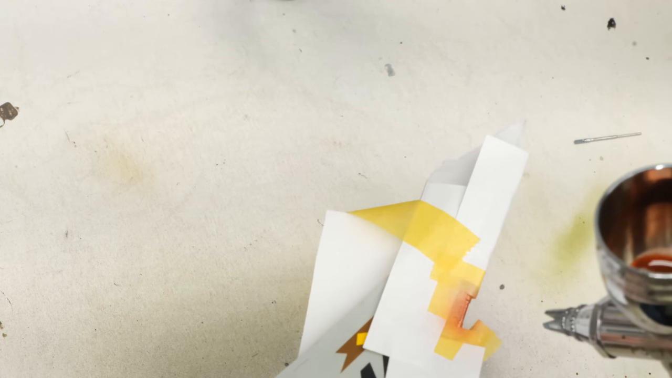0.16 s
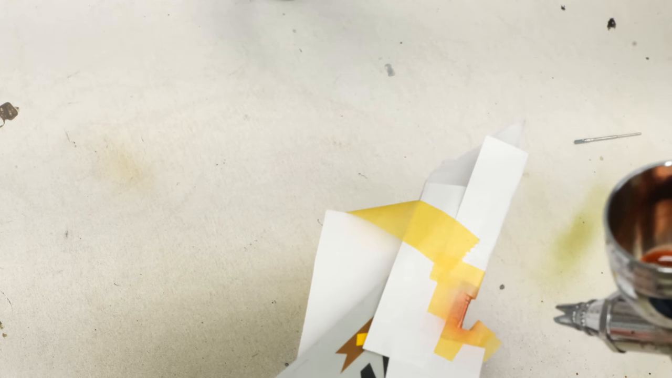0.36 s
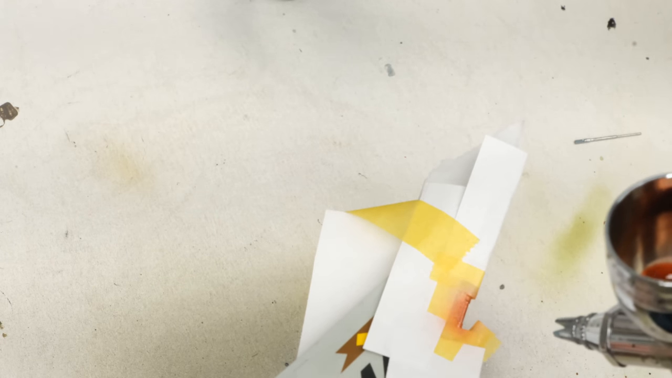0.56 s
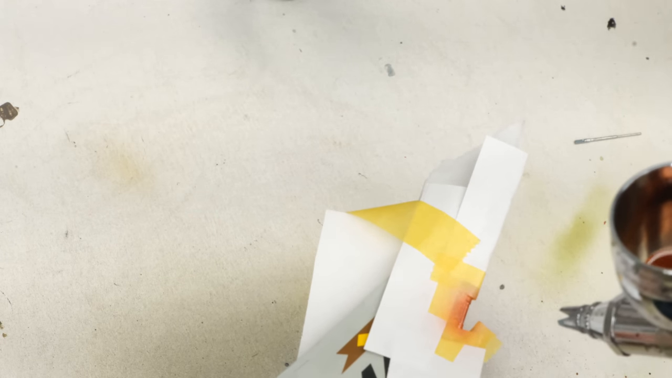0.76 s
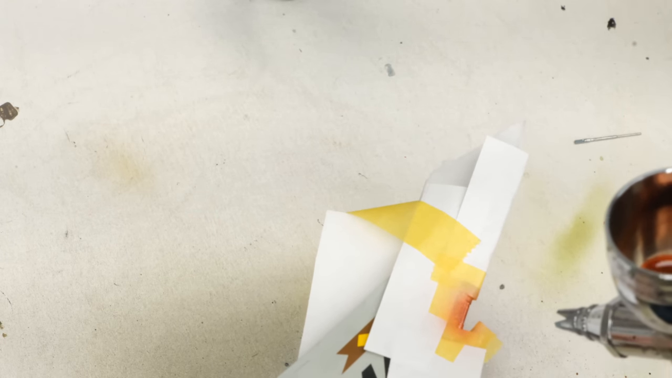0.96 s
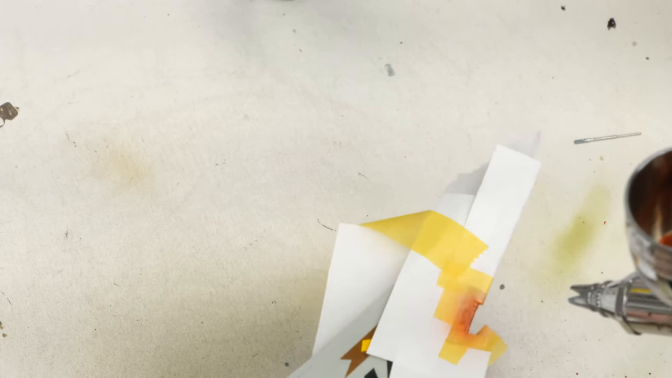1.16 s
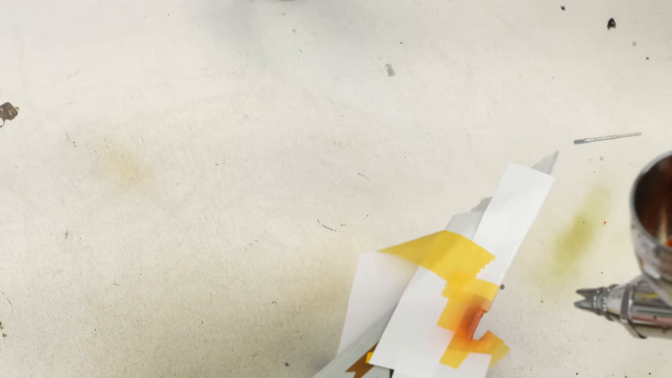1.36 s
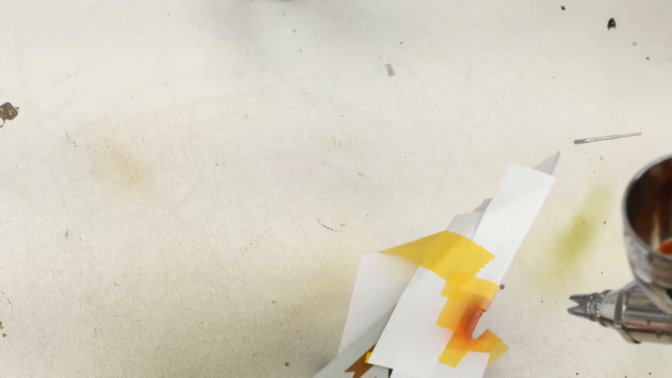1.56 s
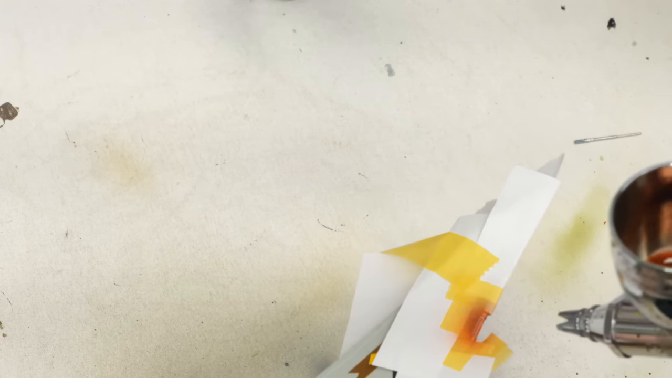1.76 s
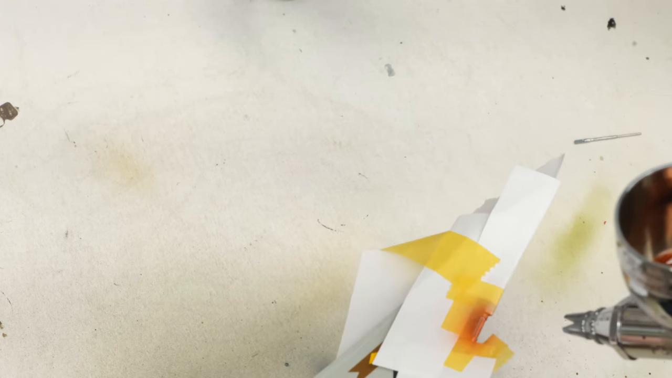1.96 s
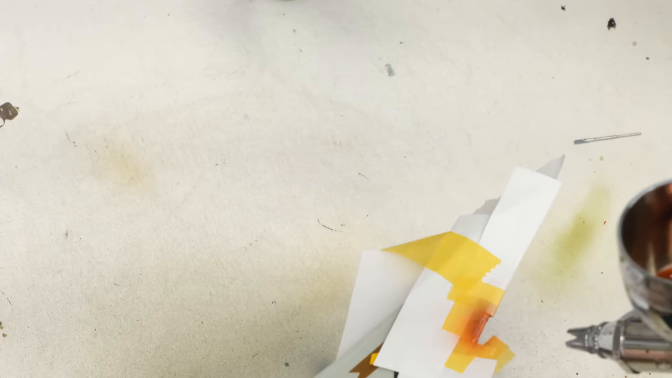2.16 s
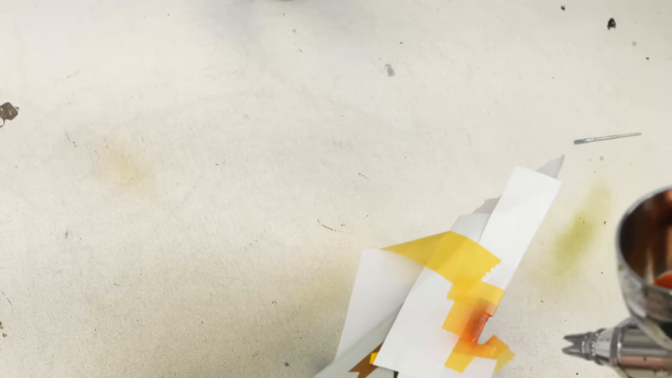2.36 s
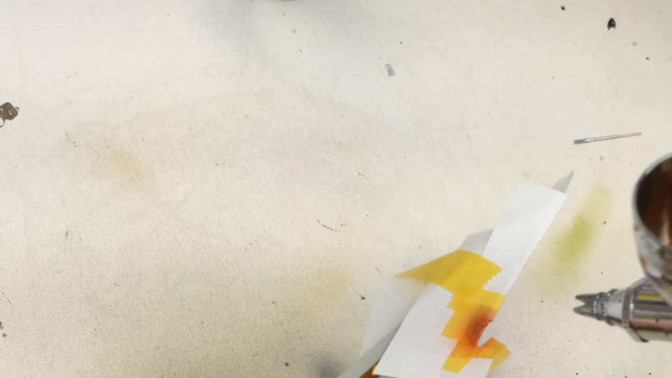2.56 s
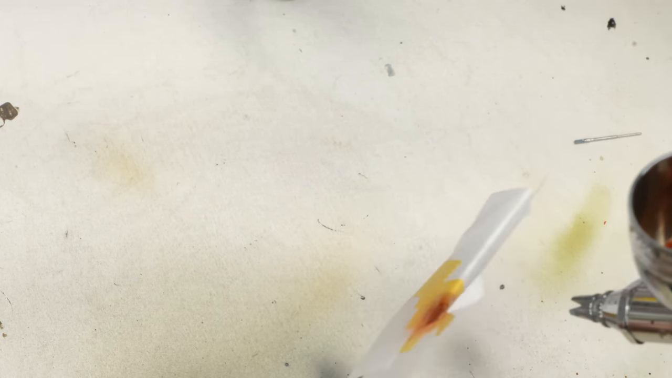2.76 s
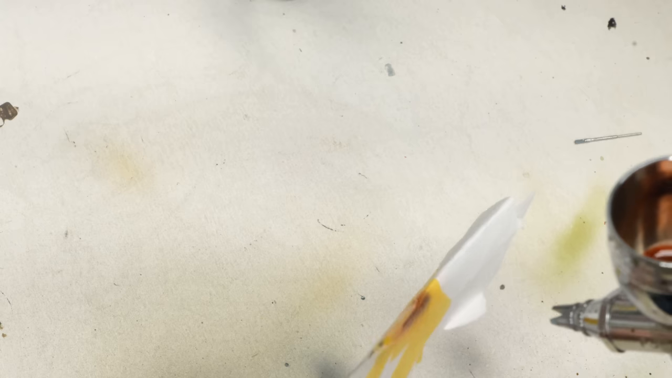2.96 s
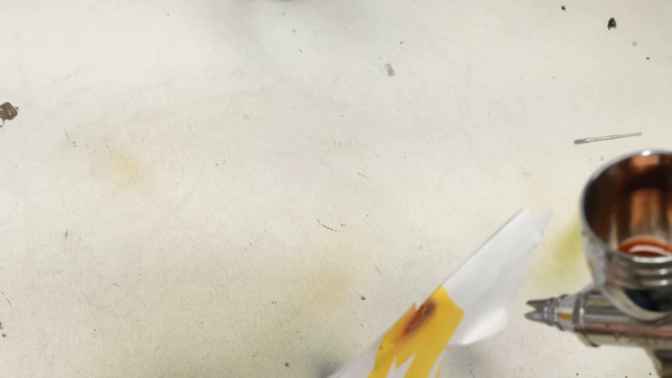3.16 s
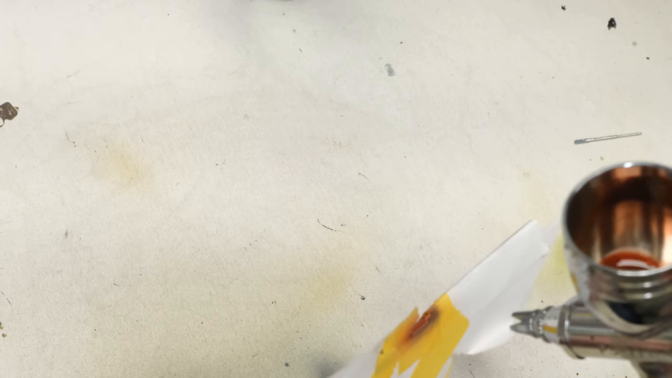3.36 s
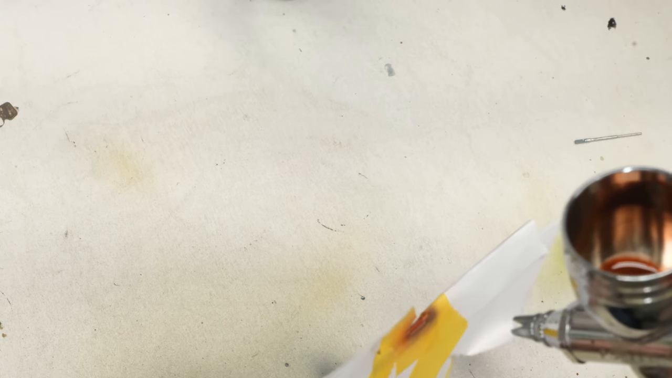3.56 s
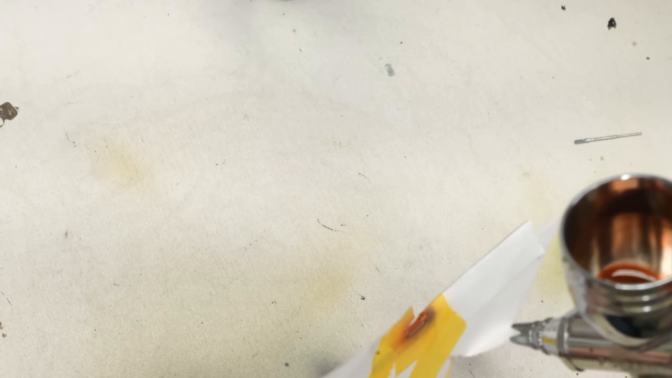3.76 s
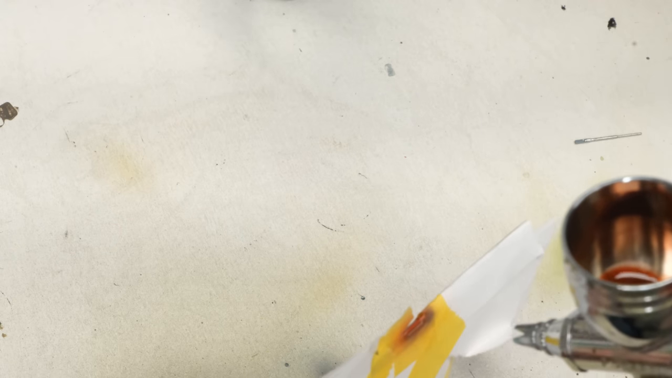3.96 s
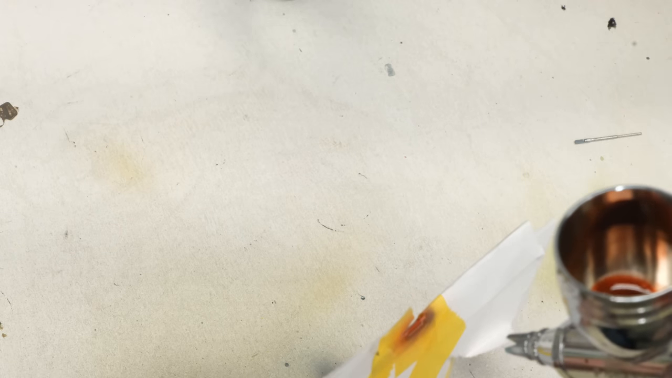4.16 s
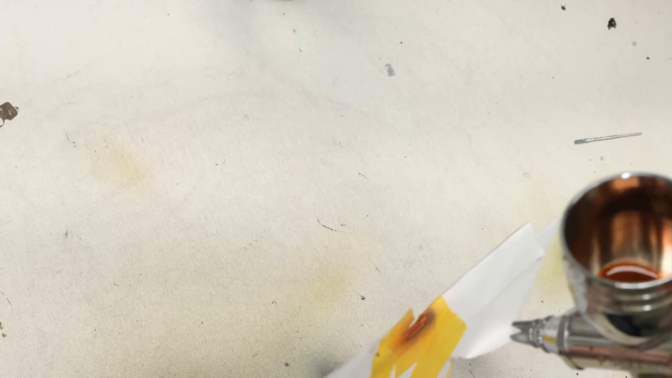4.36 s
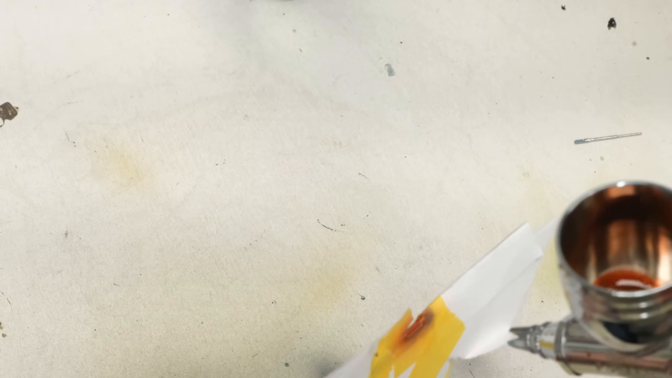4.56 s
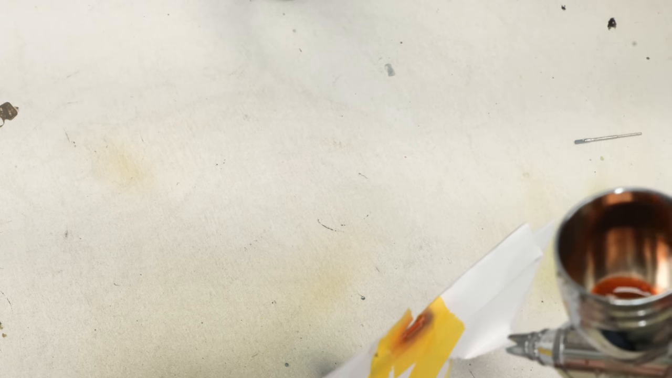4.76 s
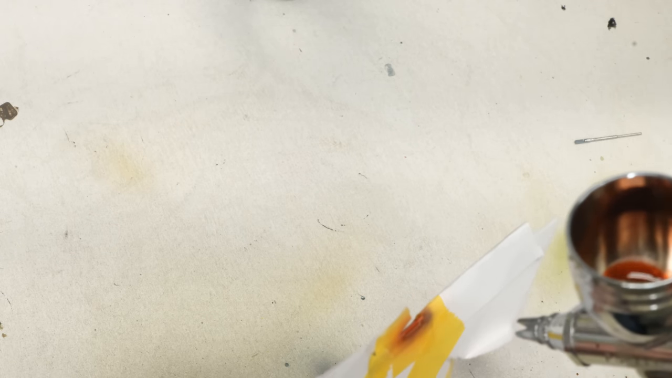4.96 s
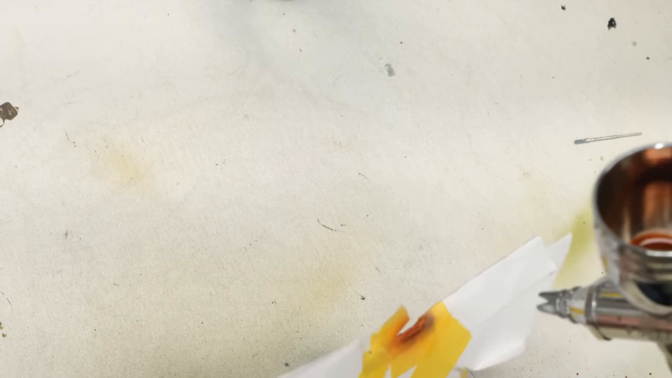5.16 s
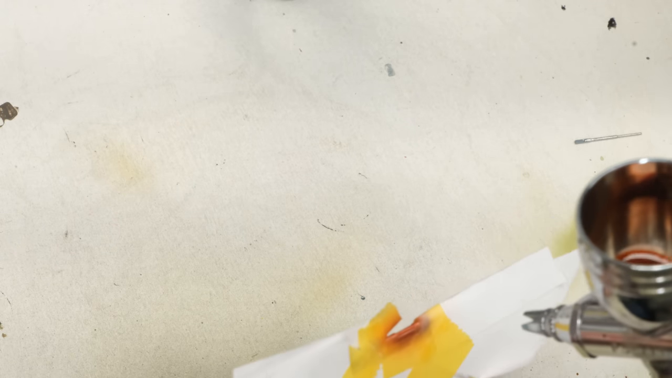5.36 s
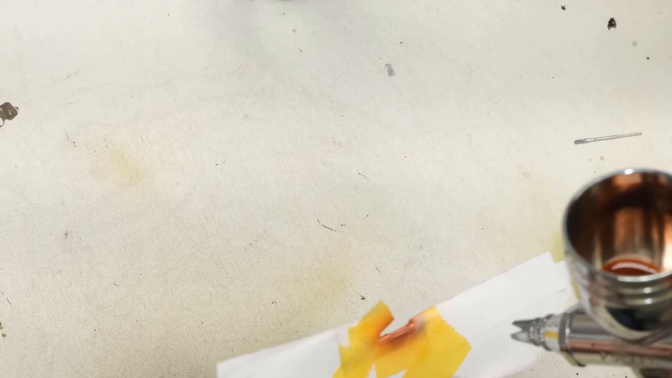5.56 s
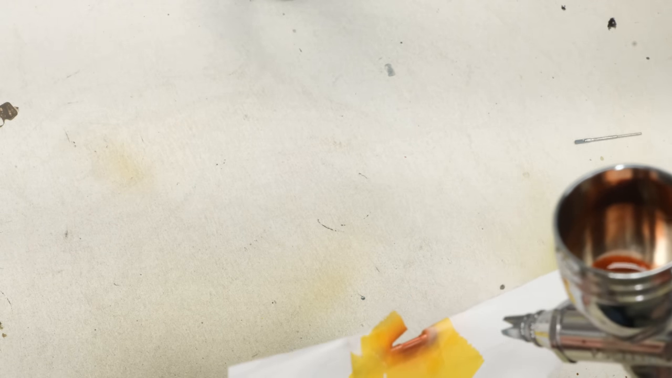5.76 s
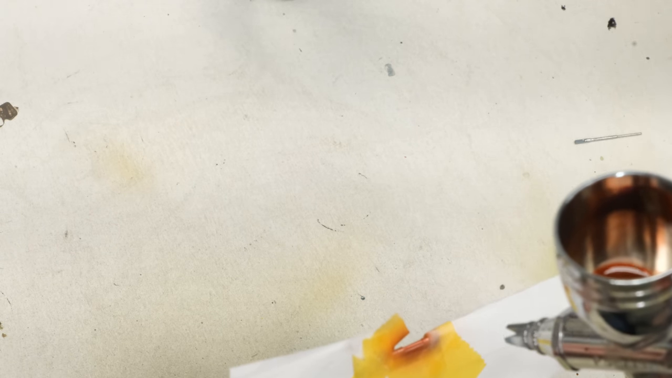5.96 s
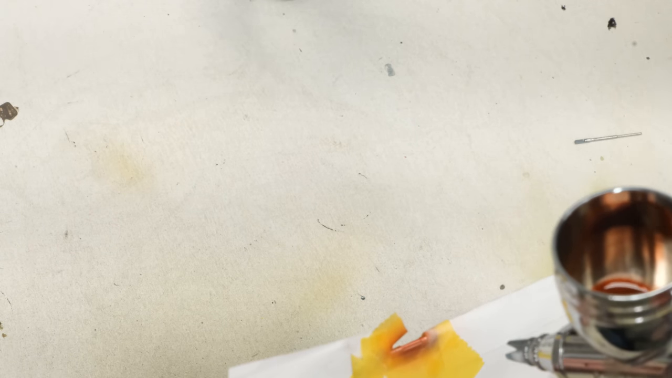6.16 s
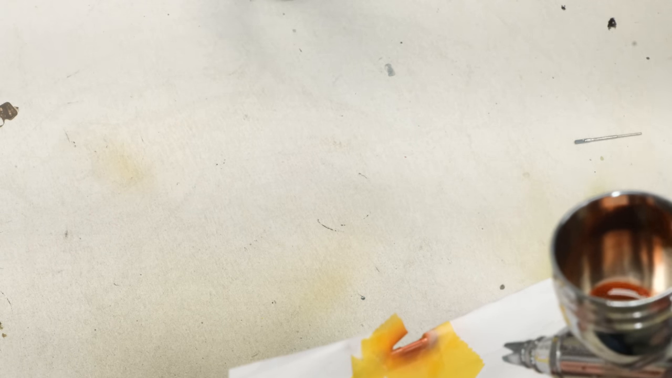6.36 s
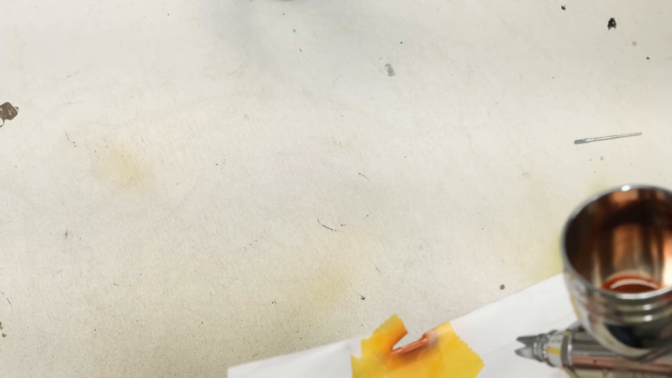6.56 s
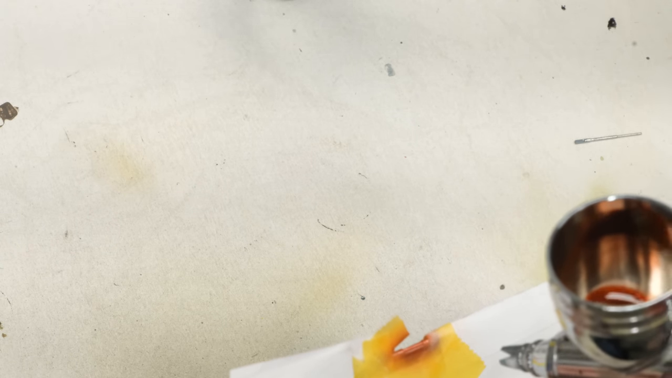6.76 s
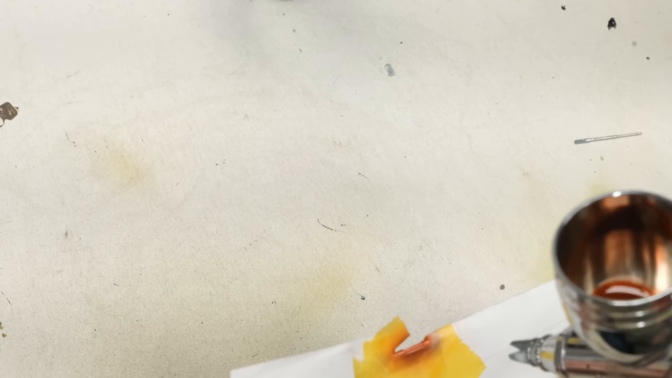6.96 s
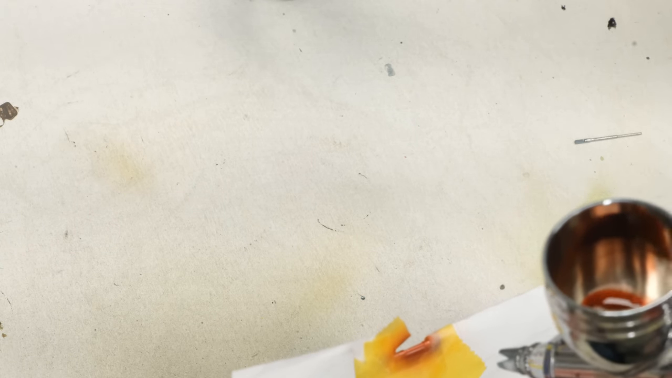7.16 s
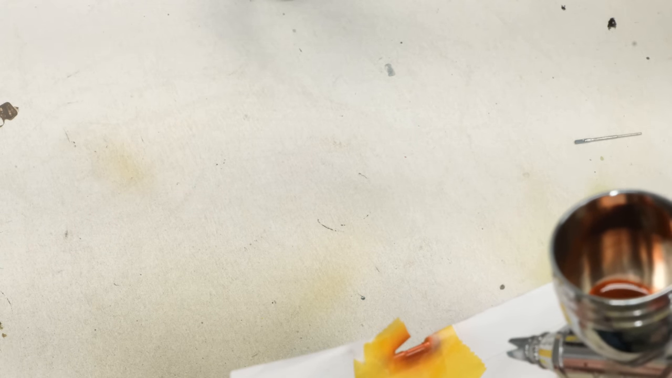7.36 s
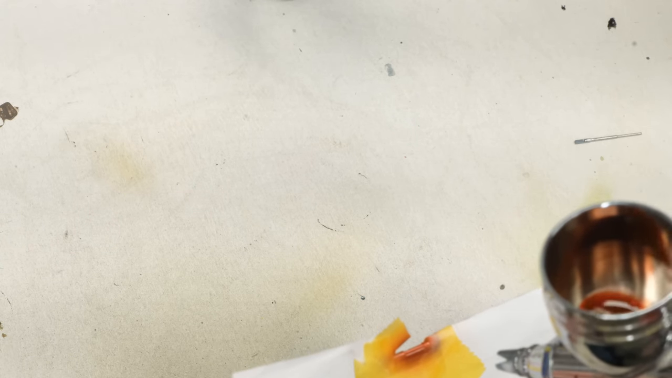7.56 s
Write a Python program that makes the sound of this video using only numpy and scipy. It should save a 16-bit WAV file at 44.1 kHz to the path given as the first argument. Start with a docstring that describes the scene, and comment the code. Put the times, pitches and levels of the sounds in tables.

```python
"""Small workshop: an airbrush, heard close, sprays masked paper in four held strokes and three quick puffs.
The jet hisses on the paper, whose folds and nearby surfaces colour it anew each time the piece is turned.
One puff misses the paper; it and the last puff spit drops of paint.
The room rings briefly, over mains hum and a soft rush of air."""
import sys
import numpy as np
from scipy import signal
from scipy.fft import rfft, irfft, next_fast_len
from scipy.io import wavfile
from scipy.ndimage import map_coordinates

SR = 44100
rng = np.random.default_rng(int(sys.argv[2]) if len(sys.argv) > 2 else 0)


def store_pcm(level_fs):
    """Save levels as 16-bit WAV."""
    pcm = np.round(np.clip(level_fs, -1, 1) * 32767).astype(np.int16)
    wavfile.write(sys.argv[1], SR, np.atleast_2d(pcm).T)


N = 339570
TIME_S = np.arange(N) / SR


def gain_of(db):
    """Decibels to amplitude."""
    return 10 ** (np.asarray(db) / 20)


def unit_rms(x):
    """Scale to rms 1."""
    return x / np.sqrt(np.mean(x ** 2) + 1e-20)


def log_interp(points, hz):
    """Interpolate (freq_hz, value) points on a log-frequency axis."""
    freq_hz, value = np.transpose(sorted(points))
    return np.interp(np.log(hz + 1), np.log(freq_hz + 1), value)


def noise(spectrum, peaks=(), size=N):
    """Noise of rms 1: broad spectrum plus bell-shaped peaks and notches."""
    length = next_fast_len(size)
    hz = np.fft.rfftfreq(length, 1 / SR)
    db = log_interp(spectrum, hz)
    for centre_hz, width_hz, height_db in peaks:
        db = db + height_db * np.exp(-2 * ((hz - centre_hz) / width_hz) ** 2)
    white = rfft(rng.standard_normal(length))
    return unit_rms(irfft(white * gain_of(db), length)[:size])


def waver(rate_hz, size=2048):
    """Slow random motion of rms 1, rolled off above rate_hz."""
    hz = np.fft.rfftfreq(size, N / SR / size)
    white = rfft(rng.standard_normal(size))
    motion = unit_rms(irfft(white / (1 + (hz / rate_hz) ** 4)))
    return np.interp(TIME_S, np.linspace(0, N / SR, size), motion)


def workshop(rush_db=-58, wobble_rad=0.11):
    """Soft rush of air and slightly wavering mains hum."""
    # freq_hz, level_db
    rush_spectrum = [(15, -18), (35, -20), (70, -6), (160, -4.5), (230, 0.5), (350, -6), (520, -7.5),
                     (800, -12), (1200, -17), (2000, -21), (3000, -25.5), (4200, -27), (6000, -30),
                     (15000, -34)]
    # centre_hz, width_hz, height_db
    rush_peaks = [(115.5, 3.4, 5.5), (237, 34, 2), (263, 50, -3.5), (296, 16, 6.5), (348, 23, 7.5),
                  (409, 19, 4.5), (522, 24, -2.5), (529.3, 23, 8.5), (3900, 850, 3)]
    # pitch_hz, rms_db
    hum_tones = [(59.9, -67.5), (119.8, -64), (204, -70)]
    rush = gain_of(rush_db) * noise(rush_spectrum, rush_peaks)
    hum = np.zeros(N)
    for pitch_hz, rms_db in hum_tones:
        phase = 2 * np.pi * (pitch_hz * TIME_S + rng.random()) + wobble_rad * waver(rate_hz=4.5)
        hum += gain_of(rms_db) * np.sqrt(2) * np.sin(phase)
    return rush + hum


def room(x, first_s=0.00594, early_db=6, early_s=.02):
    """Dense reflections, strongest at first from bench and near wall; decay varies by band."""
    # freq_hz, t60_s
    decay_times = [(200, .45), (1000, 0.35), (4000, 0.55), (8000, 0.3), (15000, 0.092)]
    t = TIME_S[:SR]
    taps = rng.standard_normal(SR) * (t > first_s) * gain_of(early_db * np.exp(-t / early_s))
    hz, frame_s, bands = signal.stft(taps, SR, nperseg=256)
    decay_db = -60 * frame_s / log_interp(decay_times, hz)[:, None]
    tail = signal.istft(bands * gain_of(decay_db), SR)[1]
    return signal.fftconvolve(x, tail / np.linalg.norm(tail))[:N]


def near_reflections(x, count=12, gain=0.28, above_hz=6500, drift_s=18e-6, first_s=.0012, last_s=.007):
    """Add treble echoes off small things near the nozzle; hand sway slides their ripples."""
    hz = np.fft.rfftfreq(N, 1 / SR)
    treble_spectrum = rfft(x) * hz ** 2 / (hz ** 2 + above_hz ** 2)
    treble = 2 * irfft(treble_spectrum, 2 * N)  # 2x oversampled for smooth delays
    fine_s = np.arange(2 * N) / (2 * SR)
    out = x.copy()
    for delay_s in np.geomspace(first_s, last_s, count) * rng.uniform(.9, 1.1, count):
        path_s = delay_s + drift_s * waver(rate_hz=0.74)
        out += gain * rng.choice([-1, 1]) * np.interp(TIME_S - path_s, fine_s, treble)
    return out


def spits(rise_s=.0007):
    """Paint drops break off the needle, each a tiny sharp puff."""
    # start_s, level_db, decay_s
    drops = [(2.9803, -31.5, 0.0023), (2.986, -48, .005), (5.457, -36, .0025), (5.6275, -51, .002),
             (5.6445, -53, .003)]
    # freq_hz, level_db
    drop_spectrum = [(600, -21), (1500, -19), (2200, -1), (2750, 0), (3470, 9), (4200, -18), (5000, 6),
                     (5700, -6), (6300, 2), (8500, -16), (11000, -30), (15000, -40)]
    envelope = np.zeros(N)
    for start_s, level_db, decay_s in drops:
        age_s = TIME_S - start_s
        envelope += gain_of(level_db) * np.clip(age_s / rise_s, 0, 1) * np.exp(-abs(age_s) / decay_s)
    return envelope * noise(drop_spectrum)


def trigger(open_s, shut_s, rise_s, fall_s=0.017):
    """Valve opens, holds, closes. Returns sample mask, times and opening 0-1."""
    on = (TIME_S > open_s) & (TIME_S < shut_s + fall_s)
    t = TIME_S[on]
    valve = np.clip((t - open_s) / rise_s, 0, 1) * np.clip(1 - (t - shut_s) / fall_s, 0, 1)
    return on, t, valve


def jet(t, valve, level_db, treble_db, body_db, aim):
    """One burst of turbulent air, coloured by its aim. Returns hiss and envelope."""
    # Aims: flat on the paper, past it, along its edge, on the lowered sheet.
    # hiss spectra: freq_hz, level_db
    hiss_flat = [(200, -53), (450, -20), (700, -9), (1000, -2), (1700, 2.4), (3000, -7.5), (4500, -1),
                 (6000, -11), (7500, -21), (10000, -26.5), (15500, -36.5)]
    hiss_past = [(350, -40), (600, -10), (756, -2.5), (866, -9), (940, 3), (1380, -11), (1490, -6.5),
                 (2190, -13), (2470, -12), (3920, -10), (4370, -11), (6580, -12), (15500, -22.5)]
    hiss_edge = [(200, -31), (450, -13), (700, -16.5), (1000, 5), (1700, -8.5), (3000, 0), (4500, -18),
                 (6000, -2.5), (7500, -15), (10000, -19), (15500, -30)]
    hiss_low = [(200, -42), (450, -29), (700, -16), (1000, 5), (1700, -9), (3000, 0), (4500, -9.5),
                (6000, -10.5), (7500, -17), (10000, -34.5), (15500, -32.5)]
    # reflections between nozzle, paper and bench: centre_hz, width_hz, height_db
    peaks_flat = [(1424, 110, -3.5), (1940, 100, -4.5), (2125, 97, -6), (2160, 1350, 9), (3146, 87, 10.5),
                  (3360, 79, 4), (4130, 99, -18), (4910, 530, -4), (7220, 180, 1), (8350, 1070, 5),
                  (9800, 380, 1.5), (11200, 370, 6), (11940, 390, 3.5), (12860, 980, 3), (15240, 240, 9)]
    peaks_past = [(780, 99, 4.4), (2550, 250, 3), (3550, 200, 3), (5150, 250, 4), (5800, 300, 4)]
    peaks_edge = [(595, 60, 9), (757, 49, 13.5), (1147, 49, 4), (1280, 43, -14), (1443, 54, 6.5),
                  (1970, 200, 6.5), (2340, 50, -15), (2440, 95, 8), (4086, 760, 12), (4980, 42, 9.5),
                  (6390, 520, -9), (7000, 230, 4), (7700, 150, -7), (9130, 760, -6.5), (11000, 370, -3.2)]
    peaks_low = [(610, 60, 12), (771, 31, 9.5), (1130, 41, 6.5), (1425, 190, 4.5), (1660, 52, 9.5),
                 (2013, 255, 7.5), (2378, 51, 8.5), (3228, 453, -18.5), (3280, 46, 9), (3775, 54, -19.5),
                 (4340, 104, 5), (6500, 130, 0), (6570, 730, -8.5), (7800, 110, -1), (10530, 1500, 9)]
    spectrum, peaks, trim_db, treble_trim_db = {
        "flat": (hiss_flat, peaks_flat, -0.68, 0.087),
        "past": (hiss_past, peaks_past, -.2, .1),
        "edge": (hiss_edge, peaks_edge, -0.57, .1),
        "low": (hiss_low, peaks_low, -0.5, 0.08),
    }[aim]
    body_hz, body_width_hz, split_hz = 850, 600, 3500
    tremor_hz, tremor_db, treble_tremor_db = 7.3, .5, 0.34  # unsteady hand
    flutter_hz, flutter_db = 28, 0.18  # uneven paint flow

    air = noise(spectrum, list(peaks) + [(body_hz, body_width_hz, body_db)], size=2 * SR)
    speed = 1 + .008 * waver(rate_hz=.9)[:len(t)]  # hand sway slides the peaks and notches
    air = map_coordinates(air, [np.cumsum(speed)], order=5)
    highpass = signal.butter(5, split_hz, "high", fs=SR, output="sos")
    treble = signal.sosfiltfilt(highpass, air)
    share_db = treble_db + treble_trim_db + treble_tremor_db * waver(tremor_hz)[:len(t)]
    share = np.clip(gain_of(share_db), 0, 1) * valve ** 0.062  # half-open valve is duller
    hiss = np.sqrt(1 - share ** 2) * unit_rms(air - treble) + share * unit_rms(treble)
    unsteady_db = tremor_db * waver(tremor_hz) + flutter_db * waver(flutter_hz)
    envelope = valve * gain_of(level_db + trim_db + unsteady_db[:len(t)])
    return np.array([hiss * envelope, envelope])


def airbrush(ease_s=0.055, dulling_db_per_db=0.35):
    """Held strokes ease off as the finger relaxes; puffs fade or sag. Returns hiss and envelope."""
    # open_s, shut_s, ease_db, treble_db, body_db, aim
    strokes = [(0.203, 1.106, 6, -4, 3, "flat"), (1.909, 2.51, 9, -2, 0, "flat"),
               (3.625, 5.037, 1.5, -5.5, 0, "edge"), (6.085, 7.99, 0, -5.5, -1.2, "low")]
    # hand-guided jet force, one curve per stroke: time_s, level_db
    force_curves = [
        [(0.22, -36), (0.268, -35), (0.874, -35.5), (1.05, -34.5)],
        [(1.93, -34), (1.974, -33.5), (2.158, -35), (2.186, -33.5), (2.262, -35.5), (2.34, -34), (2.378, -37),
         (2.46, -34.5)],
        [(3.65, -41.5), (3.818, -40.5), (4.04, -43.5), (4.338, -40.5), (4.57, -41.5), (4.6, -40.5), (5.0, -42)],
        [(6.11, -39), (6.496, -39), (6.682, -43.5), (6.69, -39.5), (6.984, -39), (7.06, -41.5), (7.068, -39.5),
         (7.596, -38.5), (7.69, -40.5)],
    ]
    # open_s, shut_s, start_db, fade_db_per_s, sag_db, treble_db, body_db, aim
    puffs = [(1.431, 1.628, -38, 27, 0, -4, 5.5, "flat"), (2.969, 3.172, -50.5, 2, 5, -5, -1.5, "past"),
             (5.444, 5.647, -42.5, -3, 5.5, -4, 1.5, "low")]
    spray = np.zeros((2, N))
    for (open_s, shut_s, ease_db, treble_db, body_db, aim), force in zip(strokes, force_curves):
        on, t, valve = trigger(open_s, shut_s, rise_s=0.019)
        eased_db = ease_db * np.clip(1 - (shut_s - t) / ease_s, 0, 1)
        level_db = np.interp(t, *np.transpose(force)) - eased_db
        spray[:, on] += jet(t, valve, level_db, treble_db - dulling_db_per_db * eased_db, body_db, aim)
    for open_s, shut_s, start_db, fade_db_per_s, sag_db, treble_db, body_db, aim in puffs:
        on, t, valve = trigger(open_s, shut_s, rise_s=0.011)
        arch = np.sin(np.pi * np.clip((t - open_s) / (shut_s - open_s), 0, 1))
        level_db = start_db - fade_db_per_s * (t - open_s) - sag_db * arch
        spray[:, on] += jet(t, valve, level_db, treble_db, body_db, aim)
    return spray


def scene(reverb_db=-15.0):
    """Spray, reverb and background, alike in both channels."""
    # jet as radiated to all sides: freq_hz, level_db
    radiated_spectrum = [(300, -14.5), (700, -11.5), (1100, 1.5), (2000, -5), (4200, -9), (6000, -12),
                         (9000, -16.5), (15000, -19)]
    hiss, envelope = airbrush()
    drops = spits()
    reverb = gain_of(reverb_db) * room(envelope * noise(radiated_spectrum) + drops)
    mono = near_reflections(hiss) + drops + reverb + workshop()
    return np.array([mono, mono])


def record(dry, self_noise_db=-72, cutoff_hz=15700):
    """Faint microphone self-noise per channel, then a low-pass."""
    # freq_hz, level_db
    self_noise_spectrum = [(20, 50), (70, 11), (200, 18), (400, 27), (1000, 3.5), (15000, 14.5)]
    hiss = gain_of(self_noise_db) * np.array([noise(self_noise_spectrum) for channel in dry])
    lowpass = signal.firwin(1023, cutoff_hz, window=("kaiser", 9), fs=SR)
    return signal.oaconvolve(dry + hiss, lowpass[None], "same")


dry = scene()
out = record(dry)
store_pcm(out)
```